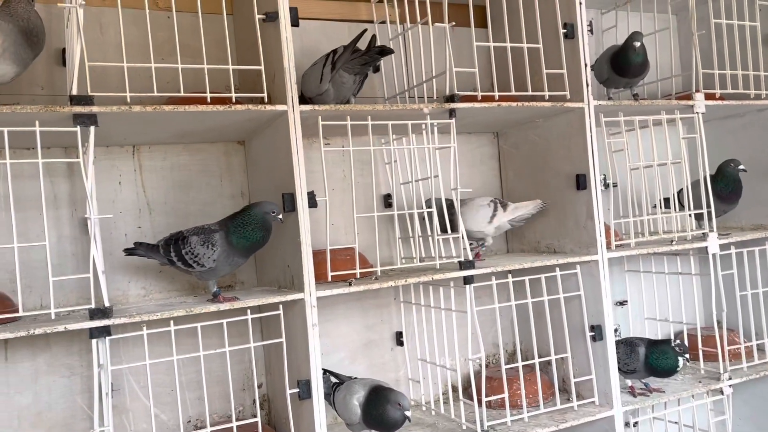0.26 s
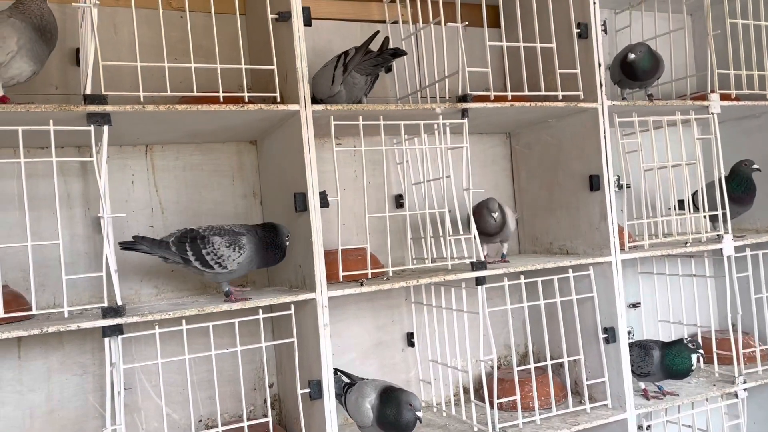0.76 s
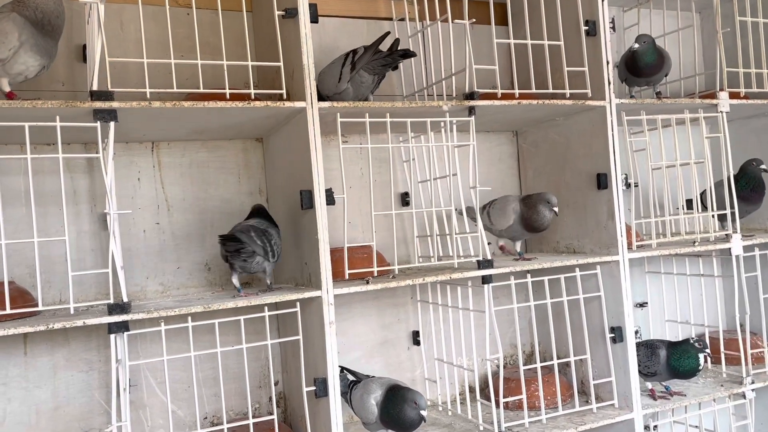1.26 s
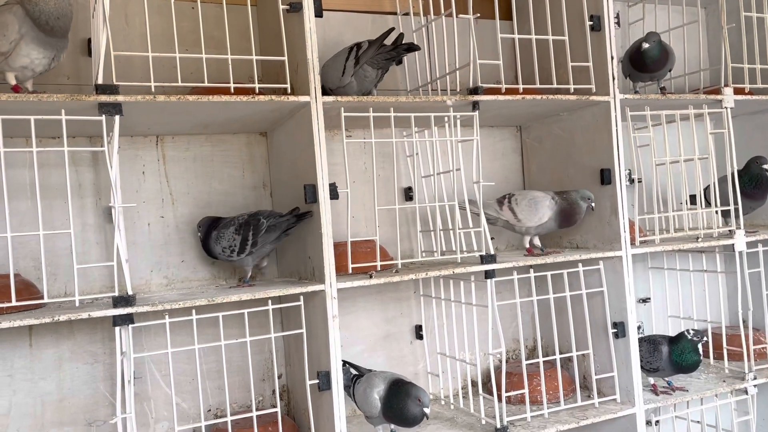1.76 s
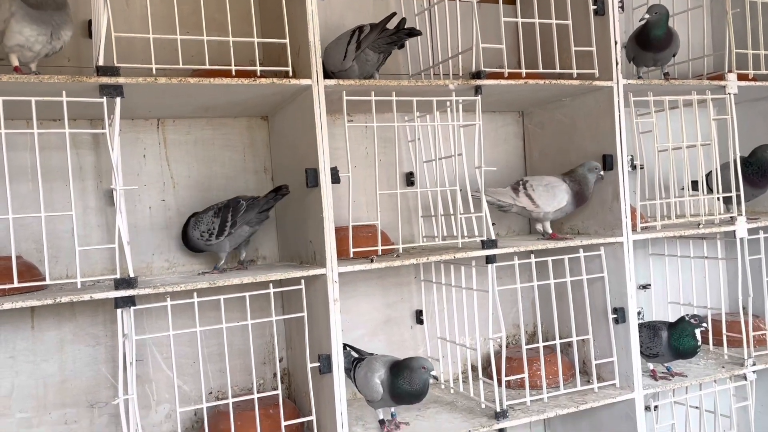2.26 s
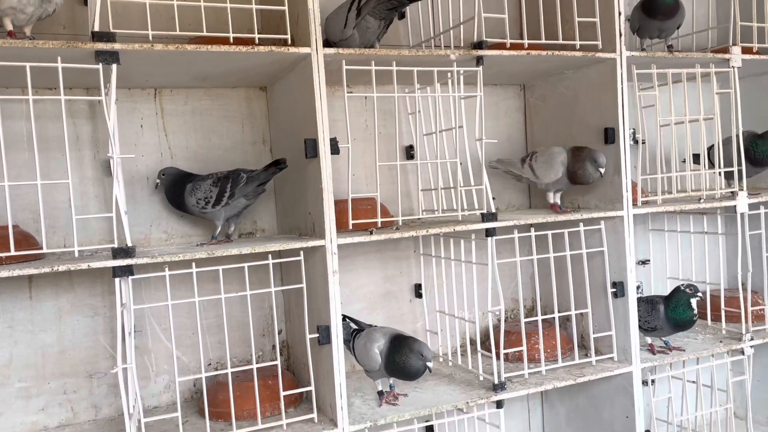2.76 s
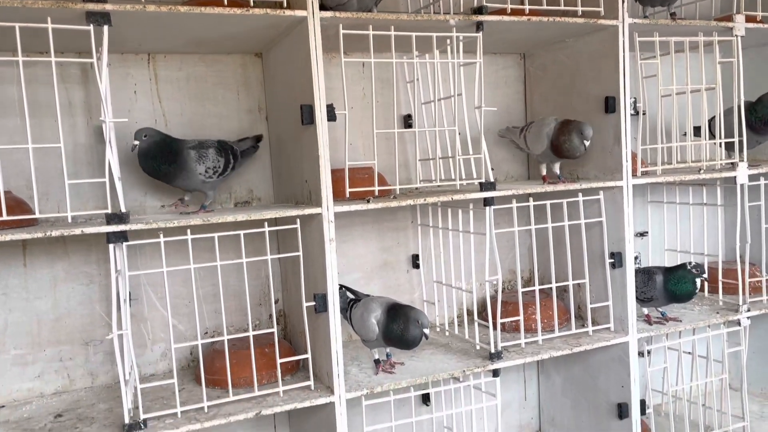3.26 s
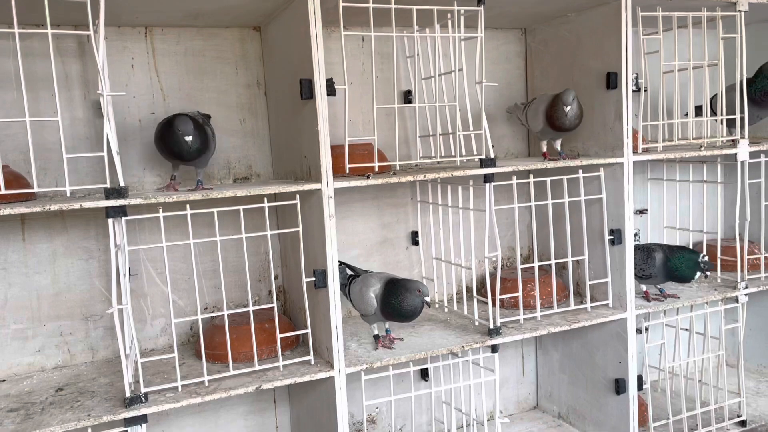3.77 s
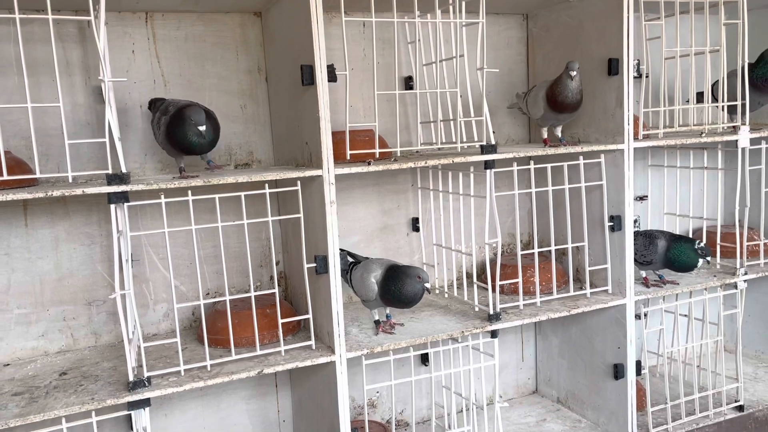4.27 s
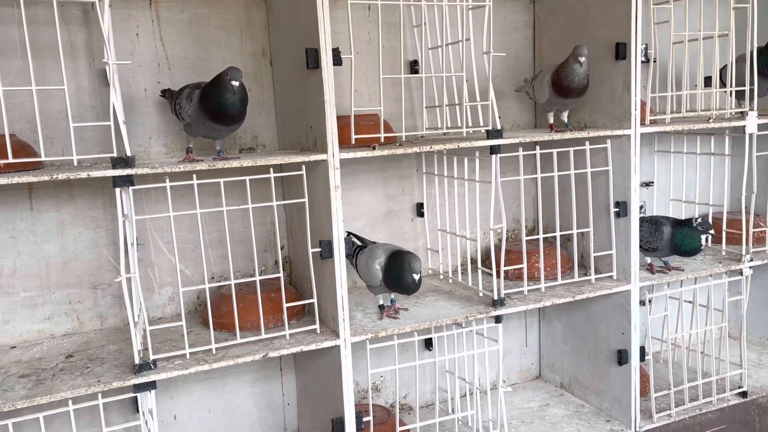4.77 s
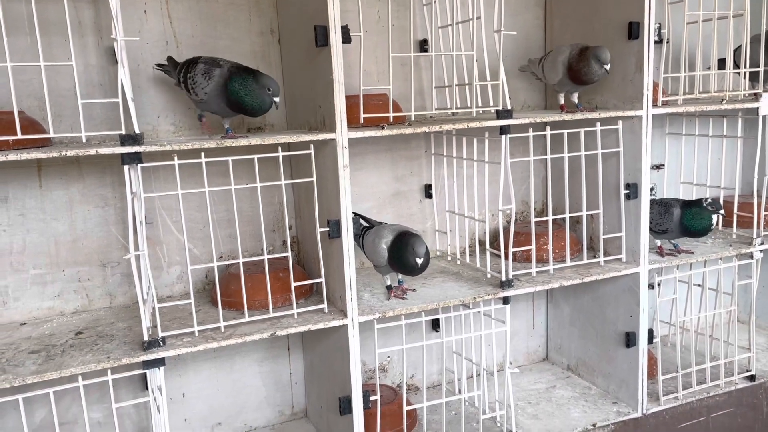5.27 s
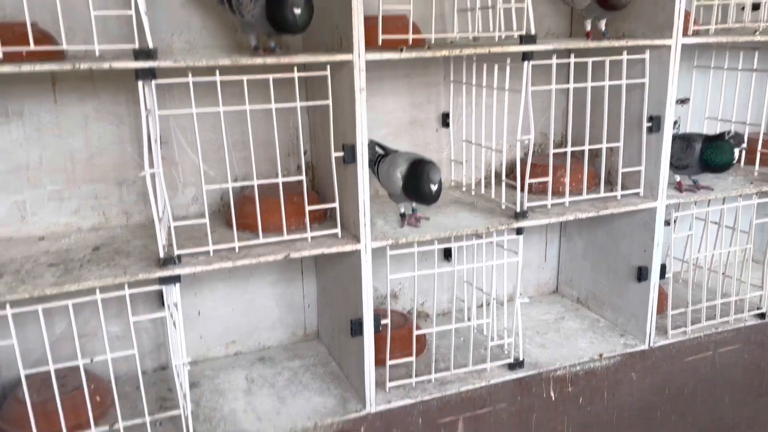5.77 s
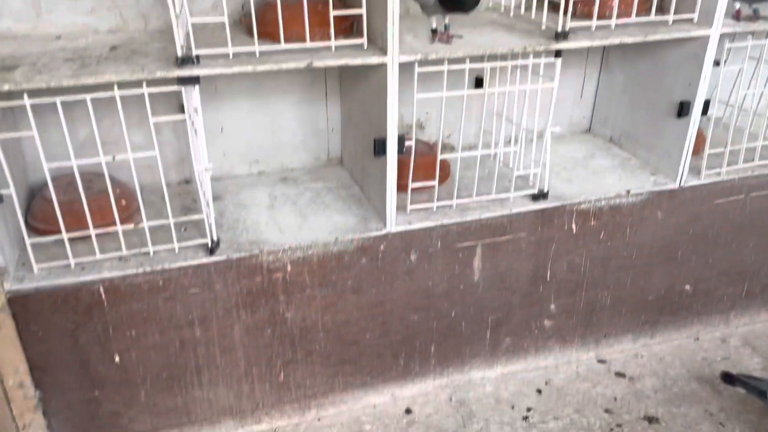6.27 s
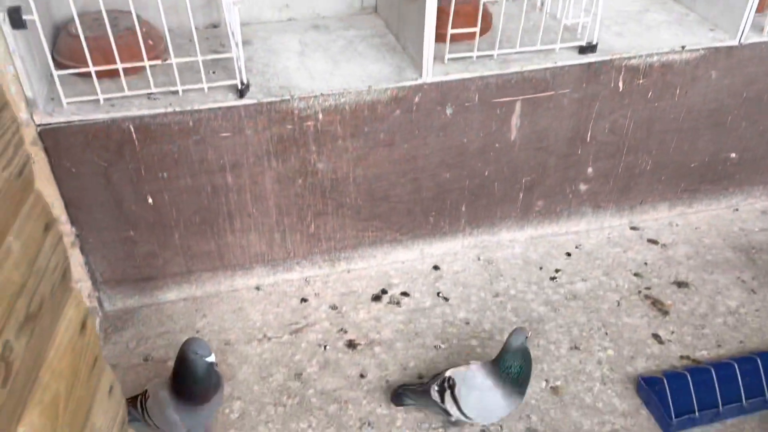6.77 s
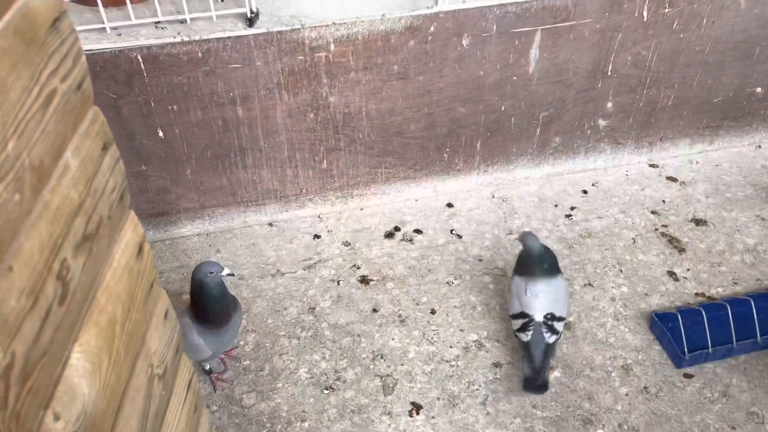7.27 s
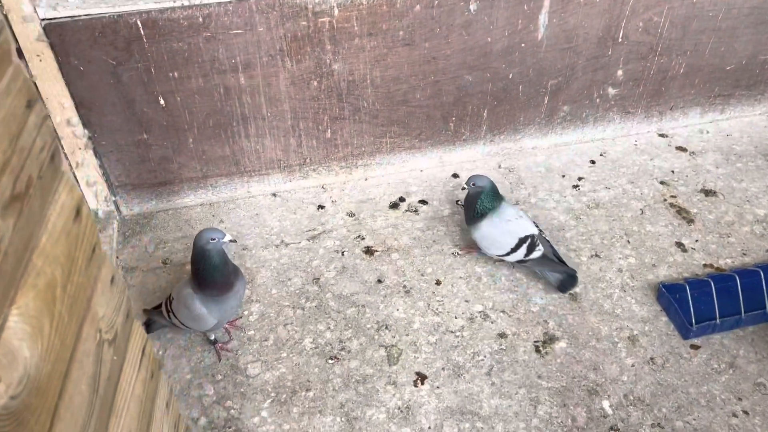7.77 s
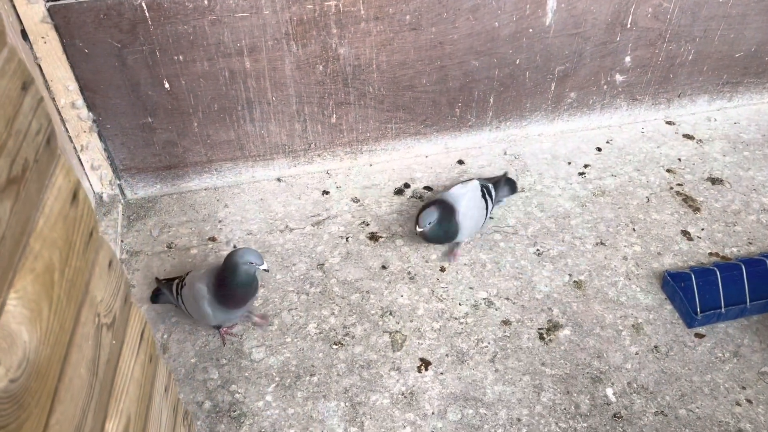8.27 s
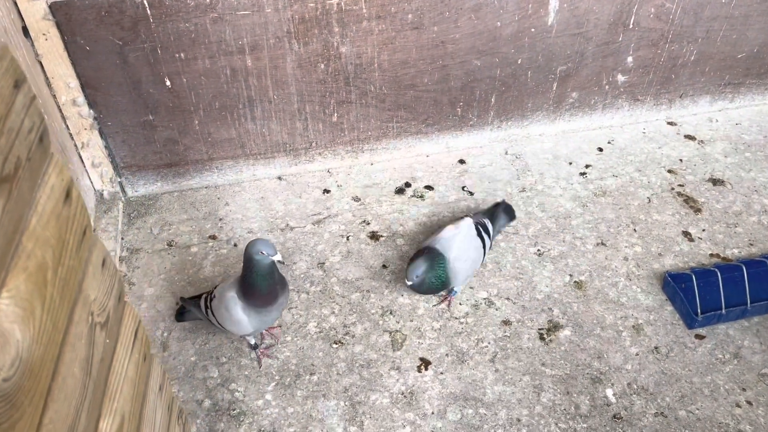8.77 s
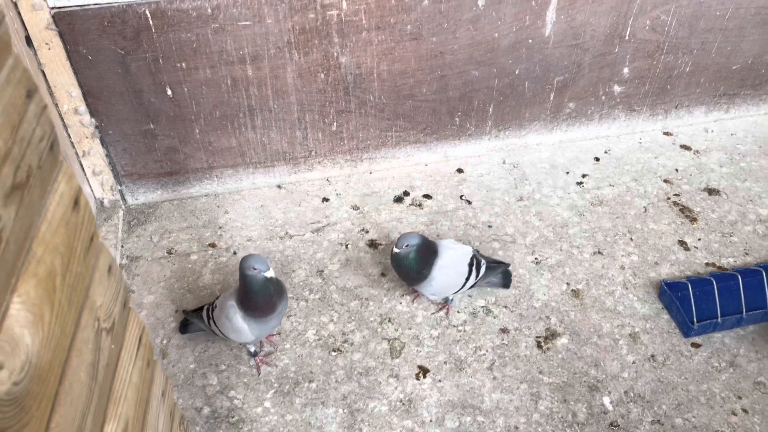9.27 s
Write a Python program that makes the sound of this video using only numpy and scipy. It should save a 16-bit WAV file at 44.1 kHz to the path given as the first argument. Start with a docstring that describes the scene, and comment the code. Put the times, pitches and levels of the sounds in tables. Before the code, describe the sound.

From the start, many pigeons coo together in a wooden loft: low, smooth, gliding notes overlap with rapid throaty rolls, strongest around 0.7-1.2 and 2.0-2.3 seconds. Farther birds blend into a soft murmur, with a short room echo, a low rumble and a steady faint hum beneath. Claws tick, shuffle and scrape irregularly on boards and wire. A soft low thump lands at about 1.3 seconds, a much fainter one near 2.4, and brief rasps appear here and there. Rolling coos gather again from 5.3. At about 5.9-6.1 a wing beats quickly, with papery slaps, feather rustle, a slight whistle and a low puff of air. Cooing continues, then thins from 7.1 to 7.6, leaving sparse claw clicks. It builds again after 8, with busy throbbing near 9 and continuing to the end at about 9.5. Close, wide stereo perspective, nearer coos slightly left.

```python
"""Pigeons coo in a wooden loft: gliding, almost pure sines, rolled into throbs; the room echoes them.
Many short farther notes murmur over a low rumble and a steady hum, both of coloured noise.
Claws tick and scrape in noise bursts and rough rings; brief rasps and two sagging thumps join in.
Just before 6 s a wing beats: slaps and rustle of filtered noise, a whistle and a low push of air.
Two close microphone ports hear it all, out of step in the treble."""
import sys
import numpy as np
from scipy import signal
from scipy.fft import rfft, irfft, next_fast_len
from scipy.io import wavfile
from scipy.ndimage import uniform_filter1d, map_coordinates

SR = 44100
rng = np.random.default_rng(int(sys.argv[2]) if len(sys.argv) > 2 else 0)


def convert_level_to_amplitude(level_db):
    """Map a level in decibels to its linear amplitude factor."""
    exponent = np.asarray(level_db, float) / 20
    return 10 ** exponent


def pcm_store(signal):
    """Save signal as 16-bit PCM."""
    levels = np.round(np.clip(np.atleast_2d(signal), -1, 1) * 32767)
    wavfile.write(sys.argv[1], SR, levels.astype(np.int16).T)


N = 419832


def unit(x):
    """Scales to rms 1."""
    return x / np.sqrt(np.mean(x ** 2) + 1e-20)


def along(points, hz):
    """Interpolates (f/Hz, value) points on a log frequency axis."""
    f, v = np.transpose(points)
    return np.interp(np.log(hz + 1), np.log(f + 1), v)


def curves(rows):
    """One value per sample for each column after the time."""
    s, *cols = np.transpose(rows)
    return [np.interp(np.arange(N) / SR, s, c) for c in cols]


def wobble(n, knots_per_s):
    """A smooth random curve of n samples."""
    knots = rng.standard_normal(int(n * knots_per_s / SR) + 4)
    return map_coordinates(knots, [np.arange(n) * knots_per_s / SR])


def filtered(x, response):
    """Applies a complex response of frequency."""
    m = next_fast_len(N + 8192)
    spectrum = rfft(x, m) * response(np.fft.rfftfreq(m, 1 / SR))
    return irfft(spectrum, m)[..., :N]


# Left-right likeness of scattered sound: f/Hz, correlation before the lean
LIKENESS = [(30, 0.77), (60, 1), (160, 0.94), (300, 0.95), (500, 0.17), (1000, 0.62), (3000, 0.36),
            (6000, 0.16), (7600, 0.98), (9400, 0.96), (11500, 0.75), (14000, 1)]
# Left-right lean of scattered sound: f/Hz, level/dB
LEAN_DB = [(60, 0.2), (300, 3.5), (1000, 1), (5500, 4), (7600, 0)]


def spread(pair, gain):
    """Mixes two unrelated sounds into coloured left and right of set likeness, rms 1."""
    def split(hz):
        turn_rad = np.arccos(np.clip(along(LIKENESS, hz), -1, 1)) / 2
        return gain(hz) * [np.cos(turn_rad), np.sin(turn_rad)]

    mid, side = filtered(pair, split)
    left_right = np.array([mid + side, mid - side])
    return unit(filtered(left_right, lambda hz: convert_level_to_amplitude(along(LEAN_DB, hz) / [[2], [-2]])))


def rush(colour, patchy_db=0):
    """Stereo noise of one colour, with time-frequency patches of random gain."""
    z = signal.stft(rng.standard_normal((2, N)), nperseg=512)[2]
    field = uniform_filter1d(rng.standard_normal(z.shape[1:]), size=5, axis=0)
    field = uniform_filter1d(field, size=8, axis=1)
    pair = signal.istft(z * convert_level_to_amplitude(patchy_db * unit(field)), nperseg=512)[1][:, :N]
    return spread(pair, lambda hz: convert_level_to_amplitude(along(colour, hz)))


def swell(t, s, ms):
    """A smooth bump centred on s; ms is its width at half height."""
    return np.cos(np.clip((t - s) / (ms / 1000), -1, 1) * np.pi / 2) ** 2


def dying(at, db, t60_s, rise_s):
    """Envelope of noise bursts that rise fast and die away, their energies summed."""
    t = np.arange(SR // 2) / SR
    kicks = np.bincount(at, convert_level_to_amplitude(2 * db), N)
    energy_decay = convert_level_to_amplitude(-120 * t / t60_s) * (1 - np.exp(-t / rise_s))
    return np.sqrt(np.abs(signal.fftconvolve(kicks, energy_decay)[:N]))


def voice(hz, pan_db, overtone_db=-40):
    """The closed-beak coo: a sine with a faint octave, slightly out of step at the two ports."""
    port_rad = 0.21 * rng.standard_normal() * np.array([[1], [-1]])
    phase = 2 * np.pi * (np.cumsum(hz) / SR + rng.random()) + port_rad
    tone = np.sin(phase) + convert_level_to_amplitude(overtone_db) * np.sin(2 * phase)
    return tone * convert_level_to_amplitude([[pan_db / 2], [-pan_db / 2]])


NEAR_PAN_DB, PAN_SCATTER_DB = 5, 2.5
# Held notes, one list of points each: t/s, f/Hz, level/dB
HELD_NOTES = [
    [(0.0, 132.5, -44), (0.2, 140.0, -49)],
    [(0, 261.3, -35), (0.14, 259.7, -33), (0.27, 254, -41)],
    [(0.0, 406.7, -34), (0.122, 362.8, -43.5), (0.13, 364.1, -60)],
    [(0.02, 521.0, -47), (0.22, 526, -57)],
    [(0.29, 300, -47), (0.39, 317, -46)],
    [(0.33, 168, -55), (0.46, 203, -43)],
    [(0.31, 420, -35), (0.36, 365, -34), (0.45, 325, -29)],
    [(0.42, 282.7, -37.5), (0.55, 301, -36.5), (0.67, 275, -29)],
    [(0.42, 525, -54), (0.59, 511, -48)],
    [(0.55, 270.3, -39), (0.7, 257.5, -34)],
    [(0.66, 257.3, -36), (0.78, 278, -31), (1.0, 279.1, -31.5), (1.16, 276.3, -25)],
    [(0.68, 456, -38), (0.85, 465, -47)],
    [(0.7, 212.5, -37), (0.78, 203.0, -35.5), (0.888, 203.0, -39), (0.954, 212.0, -38), (1.06, 206.9, -41),
     (1.1, 214.3, -35)],
    [(0.71, 376.3, -29), (0.83, 365.4, -33.5), (0.98, 356, -25.5), (1.2, 365, -34.5)],
    [(0.84, 157.4, -52), (0.99, 171, -46)],
    [(0.92, 415, -38), (1.09, 426, -42)],
    [(1.13, 168.0, -40.5), (1.37, 154.4, -48)],
    [(1.2, 262, -38), (1.29, 251, -37)],
    [(1.3, 269, -36), (1.46, 241.3, -37)],
    [(1.4, 323, -56), (1.52, 318, -35)],
    [(1.53, 494.0, -45), (1.76, 475, -60)],
    [(1.57, 328, -57), (1.7, 318, -38)],
    [(1.79, 205.2, -46), (1.87, 200.5, -34), (1.876, 200.5, -49), (1.964, 208.8, -37), (2.1, 206.1, -49)],
    [(2.97, 206.0, -39.5), (3.068, 213.3, -37), (3.102, 201.0, -43), (3.172, 200.6, -37),
     (3.22, 224.5, -42)],
    [(2.93, 300, -37), (3.05, 310, -39)],
    [(1.8, 588, -54.5), (1.96, 608, -50)],
    [(1.81, 283.3, -35), (1.94, 272, -39)],
    [(1.87, 516.0, -48), (1.99, 499, -64)],
    [(1.92, 416, -38), (1.994, 421.2, -25.5), (2.042, 410, -36.5), (2.1, 413, -35)],
    [(1.97, 351.0, -37), (2.3, 346, -37)],
    [(2.1, 300.1, -33), (2.2, 273.3, -28), (2.33, 269.1, -30.5), (2.45, 253.4, -31.5), (2.58, 261.3, -38),
     (2.68, 238.8, -33.5), (2.79, 181.4, -34), (2.9, 190, -52)],
    [(2.27, 290.7, -30), (2.48, 281, -36.5)],
    [(2.3, 381.3, -38), (2.43, 373, -39)],
    [(2.32, 125.7, -56), (2.44, 140, -45), (2.61, 111.0, -57)],
    [(2.43, 511, -44), (2.55, 520.0, -48)],
    [(2.58, 474, -51), (2.7, 481, -46)],
    [(2.84, 506, -57), (2.98, 505, -49)],
    [(2.96, 422.9, -49), (2.974, 422.9, -29.5), (3.084, 421.6, -31.5), (3.124, 385.3, -33),
     (3.174, 410.9, -37), (3.282, 404.4, -40), (3.3, 387.0, -37)],
    [(3.25, 284, -36), (3.38, 295, -26.5)],
    [(3.27, 246, -27.5), (3.42, 271, -30)],
    [(3.4, 513, -43), (3.58, 534, -64)],
    [(3.43, 341.7, -34), (3.61, 349, -46)],
    [(3.6, 228.7, -43), (3.72, 223, -38)],
    [(3.63, 257.3, -36.5), (3.74, 251.2, -36.5), (3.82, 270.2, -34), (4.0, 247, -38)],
    [(3.66, 438.0, -57), (3.79, 427.0, -51)],
    [(3.66, 501.0, -57), (3.84, 543, -45)],
    [(3.72, 127.6, -48.5), (3.97, 152.6, -46.5)],
    [(3.89, 338, -31.5), (4.15, 346.5, -28.5)],
    [(4.1, 521, -45.5), (4.2, 494, -42.5)],
    [(4.11, 250.5, -32), (4.28, 288.7, -32.5)],
    [(4.25, 425.4, -35.5), (4.45, 393.3, -46)],
    [(4.29, 203.7, -35.5), (4.43, 187, -37)],
    [(4.36, 366, -39), (4.51, 414, -33.5)],
    [(4.41, 286.3, -53), (4.424, 285.7, -29.5), (4.594, 282.7, -32), (4.714, 265.4, -31),
     (4.826, 273, -30.5), (4.874, 275, -56), (4.88, 281.8, -40)],
    [(4.52, 310, -27), (4.65, 301, -34)],
    [(4.57, 130, -49), (4.71, 130.0, -46)],
    [(4.61, 207.3, -50), (4.88, 211.7, -41.5), (5.04, 244.4, -40)],
    [(4.86, 143.7, -44), (4.98, 140, -48)],
    [(4.93, 333.2, -47), (5.03, 345.2, -37), (5.18, 354, -37)],
    [(4.97, 265.7, -47), (5.12, 264, -43)],
    [(4.98, 159.4, -50), (5.15, 184.5, -39)],
    [(5.25, 473, -52), (5.37, 443, -41)],
    [(5.26, 237.3, -30), (5.39, 223, -36)],
    [(5.28, 358, -33), (5.45, 342, -37)],
    [(5.3, 389.7, -33), (5.6, 388.8, -32.5)],
    [(5.34, 270.4, -50), (5.54, 270, -34)],
    [(5.4, 198, -37), (5.56, 197, -40)],
    [(5.6, 274, -42), (5.93, 232, -34.5)],
    [(5.62, 367.4, -40), (5.74, 393, -33.5)],
    [(5.89, 375, -34), (6.02, 403, -42)],
    [(5.93, 158.6, -45), (6.07, 151, -43.5), (6.31, 160.5, -39), (6.42, 134, -48.5)],
    [(6.07, 292.3, -50), (6.17, 279.2, -23), (6.31, 290.4, -32.5), (6.38, 272, -34), (6.46, 265, -27.5)],
    [(6.07, 324, -54), (6.19, 322, -36)],
    [(6.12, 407.5, -35), (6.24, 404.5, -35)],
    [(6.21, 544, -43.5), (6.31, 555, -55.5), (6.48, 532, -47)],
    [(6.24, 374, -33), (6.39, 397.4, -36)],
    [(6.56, 216.3, -42), (6.58, 220.9, -40), (6.714, 227.9, -32), (6.768, 255.2, -34.5),
     (6.856, 234.5, -34), (6.9, 246, -37)],
    [(6.58, 438, -44.5), (6.75, 447, -44)],
    [(6.8, 258.9, -35), (6.842, 287, -29), (6.894, 286, -39), (7.004, 282.6, -34), (7.08, 281, -45)],
    [(6.98, 420, -39), (7.06, 346, -40), (7.18, 359, -49)],
    [(7, 274.5, -29), (7.06, 194, -40)],
    [(7.15, 442, -50), (7.32, 438, -57.5), (7.43, 422, -56)],
    [(7.55, 118.5, -58), (7.63, 151, -40.5)],
    [(7.65, 174.6, -41), (7.718, 189.5, -45.5), (7.828, 204, -39.5), (7.94, 201, -44), (7.97, 221, -36)],
    [(8.0, 220, -39), (8.066, 221, -41), (8.104, 200, -41.5), (8.146, 194.5, -35), (8.26, 193.7, -38)],
    [(7.62, 388, -50.5), (7.79, 385, -52), (7.86, 430, -43)],
    [(7.92, 393, -39), (7.974, 422.1, -38.5), (8.04, 438.7, -38.5), (8.082, 423, -33), (8.116, 393, -44),
     (8.288, 370.5, -35), (8.33, 398.7, -41)],
    [(7.67, 290, -53), (7.82, 342, -60), (7.92, 333, -45)],
    [(8.0, 291.6, -43), (8.2, 277, -49)],
    [(8.35, 314.4, -42), (8.57, 319, -33)],
    [(8.4, 282.8, -36), (8.53, 279.3, -26), (8.62, 285, -29), (8.72, 298, -32.5)],
    [(8.43, 141, -45), (8.47, 141, -38.5), (8.6, 141, -46.5)],
    [(8.62, 173.8, -43), (8.63, 173.5, -36.5), (8.88, 176.6, -46), (8.9, 175.9, -53)],
    [(8.95, 189.3, -41), (9.066, 191.3, -41), (9.13, 198.0, -36.5), (9.304, 197.8, -39),
     (9.322, 192.6, -43), (9.336, 190.4, -31.5), (9.42, 181.6, -55)],
    [(9.45, 160, -41), (9.52, 160, -33)],
    [(8.2, 215, -35), (8.27, 200, -42)],
    [(9.28, 740, -58), (9.38, 735, -56)],
    [(8.45, 398.5, -42), (8.458, 402.8, -36.5), (8.64, 398.8, -40), (8.704, 418.5, -41), (8.75, 391.9, -47)],
    [(8.85, 403.7, -34), (9.012, 397.3, -40), (9.046, 405.8, -36), (9.138, 396.3, -30),
     (9.22, 397.4, -41.5)],
    [(8.68, 358.5, -30), (8.722, 353.6, -34), (8.86, 359.7, -32.5), (9.002, 343.4, -31.5),
     (9.048, 351.2, -29), (9.128, 354.0, -31), (9.13, 354.1, -35)],
    [(8.88, 303.8, -31), (9.0, 315.4, -31)],
    [(8.98, 285, -27), (9.19, 304, -38)],
    [(9.05, 122.4, -55), (9.27, 131.0, -53)],
    [(9.1, 278.5, -37), (9.32, 270, -35)],
    [(9.24, 400.3, -31), (9.248, 401.1, -37), (9.3, 382.9, -35.5), (9.468, 357.6, -41), (9.51, 358.0, -34)],
]


def coos(murmur_db):
    """Held notes glide, waver, flutter and give way while the same throat throbs."""
    lead_s, attack_s, release_s = .025, .035, .07
    waver_db, flutter_depth, flutter_hz = 1.8, .1, 36
    out = throbs(murmur_db)
    for note, side in zip(HELD_NOTES, rng.standard_normal(len(HELD_NOTES))):
        s, pitch_hz, db = np.transpose(note)
        first = max(round((s[0] - lead_s) * SR), 0)
        n = np.arange(first, min(round((s[-1] + release_s / 2) * SR), N))
        hz = uniform_filter1d(np.interp(n / SR, s, pitch_hz), size=1500, mode="nearest")
        fade = np.clip(np.minimum((n - n[0]) / attack_s, (n[-1] - n) / release_s) / SR, 0, 1)
        level = np.sqrt(2) * convert_level_to_amplitude(np.interp(n / SR, s, db) + waver_db * wobble(len(n), 14.85))
        flutter_rate = flutter_hz * (1 + 0.24 * wobble(len(n), 6.48))
        flutter = np.sin(2 * np.pi * (np.cumsum(flutter_rate) / SR + rng.random()))
        level *= 1 + flutter_depth * flutter
        for at, _, throb_hz, ms in THROAT_PULSES:
            if s[0] < at < s[-1]:
                nearness = np.exp(-((hz - throb_hz) / 45) ** 2)
                level *= 1 - 0.95 * swell(n / SR, at, ms) * nearness
        wavering_hz = hz * (1 + 0.0061 * wobble(len(n), 12.43))
        out[:, n] += fade * level * voice(wavering_hz, NEAR_PAN_DB + PAN_SCATTER_DB * side)
    return out


# Loud pulses of rolled coos: t/s, level/dB, f/Hz, longest half-height width/ms
THROAT_PULSES = [(0.116, -23, 309, 12.1), (0.143, -25, 280.5, 44), (0.314, -22, 299, 20),
                 (0.406, -17, 338, 29.6), (0.498, -21, 286, 17.5), (0.706, -19, 284, 11.6),
                 (0.765, -13, 358.6, 28), (0.837, -21.5, 282, 21.5), (0.843, -16, 377, 14.4),
                 (0.907, -13, 319, 7.3), (0.94, -17, 360, 8.3), (0.953, -14.5, 373, 20),
                 (0.992, -19, 340, 29), (1.02, -18.5, 341, 14), (1.046, -19, 327, 5.9),
                 (1.061, -18.5, 301, 16), (1.077, -20, 276, 11.8), (1.112, -16, 284.7, 25),
                 (1.152, -13, 304, 6), (1.848, -24, 290, 13.2), (1.918, -21, 269, 19),
                 (1.989, -18.5, 269.4, 25.3), (1.993, -22, 394, 10.9), (2.007, -14.5, 358, 6.9),
                 (2.071, -14, 318, 10.7), (2.095, -15.5, 323, 14.4), (2.142, -16.5, 329, 15.5),
                 (2.162, -16, 306, 8.9), (2.176, -12.5, 315, 9.4), (2.205, -19, 316, 12),
                 (2.22, -21.5, 281, 11), (2.267, -22, 269, 23), (2.296, -22.5, 282.6, 26),
                 (2.397, -24.5, 289, 45), (2.564, -18, 264.3, 45), (2.978, -23.5, 418.5, 23),
                 (3.006, -21.5, 302, 15.44), (3.074, -23.5, 416.3, 31.4), (3.076, -20, 278, 16),
                 (3.219, -23, 262, 16), (3.273, -20.5, 270, 14), (3.349, -21.5, 277, 16.9),
                 (3.386, -29.5, 260.6, 32), (3.509, -24.5, 340, 25.5), (3.792, -23.5, 324, 9.9),
                 (3.901, -19.5, 350.7, 16), (3.945, -18, 327, 14.6), (3.971, -18.5, 333, 23),
                 (4.057, -19.5, 368, 16.2), (4.093, -15.5, 329, 11), (4.119, -25, 343, 21.5),
                 (4.146, -25, 273.5, 27), (4.167, -22, 237.2, 13), (4.244, -20, 318, 15),
                 (4.345, -21.5, 263, 17.4), (4.542, -20.5, 301, 9.8), (4.566, -20.5, 289, 23),
                 (4.603, -22.5, 303.6, 37), (5.139, -22.5, 341, 16.2), (5.306, -18, 252.5, 11.2),
                 (5.323, -20.5, 382, 11.3), (5.367, -15, 331, 11.7), (5.371, -21.5, 254, 10.3),
                 (5.436, -13.5, 294, 15), (5.475, -20, 375, 16), (5.521, -20, 370, 12.6),
                 (5.52, -20, 243, 8.3), (5.636, -15, 280, 17.1), (5.647, -18.5, 307, 8.1),
                 (5.668, -21, 353, 9.3), (5.689, -18, 350, 6.6), (5.707, -20, 266, 16),
                 (5.754, -18.5, 254, 11), (5.776, -21.5, 245, 18), (5.794, -26, 281, 22),
                 (5.815, -22, 268, 15), (5.828, -17, 342, 10), (5.855, -19, 248, 7.3),
                 (5.92, -13.5, 325, 8.9), (6.092, -21, 371, 17.5), (6.109, -15, 312, 16.3),
                 (6.135, -20, 284, 16.4), (6.164, -18.5, 277, 16), (6.199, -20, 274, 18),
                 (6.229, -18, 310, 9.4), (6.248, -19.5, 276, 28), (6.289, -20, 275, 14),
                 (6.31, -20, 298, 10), (6.393, -20.5, 262, 41), (6.458, -19.5, 325, 15.1),
                 (6.723, -15.5, 348, 11.6), (6.755, -22, 312, 11), (6.786, -25.5, 292, 22.7),
                 (6.837, -22.5, 289, 15), (6.86, -20.5, 276, 7.8), (6.877, -26, 240, 12.6),
                 (7.012, -24, 251, 14.7), (7.05, -22.5, 340, 5.9), (7.883, -27, 348, 12),
                 (8.092, -27, 411, 21), (8.286, -22, 273, 10.9), (8.36, -19, 266, 8.6),
                 (8.42, -20.5, 283, 16.7), (8.467, -17, 325.5, 23), (8.494, -17.5, 302, 16.4),
                 (8.519, -19, 302, 17.5), (8.564, -16.5, 314.4, 28), (8.612, -17, 310, 11),
                 (8.704, -23.5, 283, 20.4), (8.787, -20.5, 300, 10.2), (8.84, -22, 332, 12),
                 (8.853, -22, 330, 7.8), (8.864, -16.5, 325, 7.6), (8.887, -17.5, 335, 7.6),
                 (8.926, -19.5, 320, 15), (8.972, -17, 306.3, 22.3), (9.008, -15, 321, 11),
                 (9.025, -27, 354, 8), (9.042, -16, 338, 9.4), (9.057, -19.5, 348, 9.9),
                 (9.076, -14, 340, 11), (9.112, -22, 305, 15), (9.146, -20, 320, 8.2),
                 (9.226, -24.5, 314, 39), (9.274, -25.5, 277, 20.4), (9.297, -21.5, 253, 6.9),
                 (9.363, -26, 368, 14.6)]


def throbs(murmur_db, count=60):
    """Short swells, each on one pitch; in a roll a swell is over before the next one peaks."""
    roll_share, same_throat_hz = 0.85, 35  # share of the time to the nearest pulse; pitch range
    faint_ms, faint_scatter_db = 16, 4
    tilt_db_per_octave, throat_hz = -12, 356
    out = np.zeros((2, N))
    times, pitches = np.transpose(THROAT_PULSES)[[0, 2]]
    rows = []
    for s, db, hz, ms in THROAT_PULSES:
        same_throat = (np.abs(pitches - hz) < same_throat_hz) & (times != s)
        gap_ms = 1000 * np.abs(times - s)[same_throat].min()
        rows.append((s, db, hz, min(ms, roll_share * gap_ms)))
    # small throbs at random, around the level of the murmur
    for when, high, loud, long in rng.random((count, 4)):
        s = .1 + when * (N / SR - .2)
        hz = 140 * 4 ** high
        db = murmur_db[round(s * SR)] + faint_scatter_db * (2 * loud - 1)
        db += tilt_db_per_octave * abs(np.log2(hz / throat_hz))
        rows.append((s, db, hz, faint_ms * (.5 + long)))
    for s, db, hz, ms in rows:
        n = np.arange(round((s - ms / 1000) * SR), round((s + ms / 1000) * SR))
        out[:, n] += convert_level_to_amplitude(db) * swell(n / SR, s, ms) * voice(np.full(len(n), hz), NEAR_PAN_DB)
    return out


# Decay of the room's answer: f/Hz, t60/s
LOFT_T60_S = [(200, 0.48), (1000, 0.72)]


def loft(x):
    """Room echo: a noise tail in which each frequency dies at its own speed."""
    hz, t, z = signal.stft(rng.standard_normal((2, SR // 2)), SR, nperseg=256)
    decay = convert_level_to_amplitude(-60 * t / along(LOFT_T60_S, hz)[:, None])
    tail = signal.istft(z * decay, SR, nperseg=256)[1]
    late = np.pad(x, (400, 0))[None]  # 9 ms
    return signal.fftconvolve(late, tail / np.linalg.norm(tail[0]), axes=1)[:, :N]


# Colour of the far birds: f/Hz, relative level/dB per Hz
MURMUR_COLOUR = [(53, -31.5), (90, -24), (178, -6), (279, -5), (394, -1.5), (540, -12), (660, -20.5),
                 (865, -30), (1100, -35), (1430, -45), (2420, -120)]


def far_birds(level_db, count=850):
    """Many overlapping, slightly gliding notes of farther birds over their blurred echo."""
    start, long, high, loud, side, glide = rng.random((count, 6)).T[..., None]
    t = np.arange(SR // 3) / SR
    life_s = .05 + .16 * long ** 2
    hz = 115 * 5 ** high
    envelope = np.sin(np.pi * np.clip(t / life_s, 0, 1)) ** 2
    notes = envelope * np.sin(2 * np.pi * hz * t * (1 + 0.33 * (glide - .5) * t))
    notes *= convert_level_to_amplitude(3 * loud) / np.sqrt(life_s)
    # sum the notes into two channels laid end to end
    room = N + len(t)
    at = (start * N).astype(int) + np.arange(len(t)) + (side > .5) * room
    pair = np.bincount(at.ravel(), notes.ravel(), 2 * room).reshape(2, -1)[:, :N]
    notes = spread(pair, lambda f: convert_level_to_amplitude(along(MURMUR_COLOUR, f)) * np.sqrt(f))
    return convert_level_to_amplitude(level_db - 4) * (0.7 * notes + 0.65 * rush(MURMUR_COLOUR))


# Colour of the building's rumble: f/Hz, relative level/dB per Hz
RUMBLE_COLOUR = [(12, -61), (20, -30), (30, -47.5), (51, 7.5), (97, 1.5), (130, 1.5), (170, -23),
                 (290, -120)]
# Colour of the loft's steady hum: f/Hz, relative level/dB per Hz
HUM_COLOUR = [(90, -37), (130, 8.5), (350, -21.5), (600, -5.5), (830, -6), (1150, -17), (1800, -14),
              (2600, -30), (6500, -39.5), (7600, -120)]


def rumble_and_hum(rumble_db):
    """Low noise of varying level over patchy noise of steady level."""
    return convert_level_to_amplitude(rumble_db) * rush(RUMBLE_COLOUR) + convert_level_to_amplitude(-54.5) * rush(HUM_COLOUR, patchy_db=3.5)


def scrapes(at, db, hz):
    """Rough, narrow rings: each a sine times fast random curves, dying away."""
    out, t = np.zeros((2, N + SR)), np.arange(SR // 8) / SR
    for n, level_db, f in zip(at, db, hz):
        rough = np.array([wobble(len(t), 260), wobble(len(t), 260)])
        envelope = convert_level_to_amplitude(level_db - 60 * t / 0.29) * (1 - np.exp(-t / 0.0024))
        out[:, n:n + len(t)] += envelope * rough * np.sin(2 * np.pi * f * t)
    return out[:, :N]


# Claw steps: t/s, level/dB, then relative board/dB, grit/dB, room/dB
CLAW_STEPS = [(0.103, -39, -6, -18, -1), (0.288, -34.5, -9, -13, -19), (0.347, -29, -9, -18, -1),
              (0.392, -39.5, -4, -15, 6), (0.4796, -35, -4.5, -18, 0.5), (0.715, -46, -9, -13.5, 13.5),
              (0.833, -31, -4, -18, -0.5), (0.944, -27.5, -14, -18, 2.5), (1.158, -36.5, -8, -21, 8.5),
              (1.304, -26.5, -6.5, -19, -2), (1.403, -38, -9, -13, 7), (1.522, -35.5, 0.5, -19, -1.5),
              (1.6074, -33.5, -3, -17, -6), (1.67, -35.5, -14, -13, 5), (1.719, -29.5, -7.5, -16, -3),
              (1.844, -34, -11, -17, 1.5), (2.0244, -35.5, 1, -27, -5), (2.0975, -31, -2, -17, -5),
              (2.154, -43, -18, -10, -1), (2.182, -32.5, -11, -12, -1.5), (2.559, -35, -22, -19, -14),
              (2.68, -40.5, -7, -10.5, 3), (2.7055, -32, -5, -9.5, -5), (2.8443, -37.5, -13, -16, 4),
              (2.863, -43, 2, -23, 7.5), (2.979, -39.5, -3, -19, 2.5), (3.102, -34, -9, -17, 2.5),
              (3.258, -42, -4, -15, 3), (3.31, -34.5, -4.5, -22, 1.5), (3.4082, -35.5, -1, -17, -4),
              (3.4943, -39, -9, -18, 3), (3.563, -33, -1, -18, -1), (3.6747, -45, -1, -14, 3.5),
              (3.727, -36, -1.5, -19, 4.5), (3.8, -42, 4, -18, -5), (3.9443, -45, 4, -20, 3),
              (4.0684, -33.5, -5, -16, -1), (4.116, -36.5, -14, -15, -1), (4.137, -40.5, -1.5, -9.5, 6.5),
              (4.364, -41, -5.5, -18, 8.5), (4.563, -40, -2, -16, 2), (4.604, -36.5, -3.5, -9, 1),
              (4.8467, -41.5, -3.5, -10, 1), (4.9366, -34.5, -6, -18.5, 2), (4.9694, -39, -19, -17, 6),
              (5.0067, -30.5, -7.5, -17, -3), (5.11, -50, -13, -2, -14), (5.215, -42, -2, -16, 6.5),
              (5.277, -40.5, -2, -9, 2), (5.361, -43, -5, -12, 7.5), (5.4326, -31.5, -6.5, -21.5, 3),
              (5.555, -22.5, 2, -23, -3), (5.6327, -37, -5, -11, 5.5), (5.726, -34.5, -1, -13, -4.5),
              (5.787, -25.5, 0, -42, -6), (5.893, -28, -15, -14, -4), (5.9444, -32.5, -10, -19, 5),
              (5.986, -28.5, 6.5, -19, -1.5), (6.0837, -30, -7, -10, -3), (6.0905, -25, 4.5, -30, -6.5),
              (6.455, -43.5, -19, -11.5, 8), (6.5228, -33.5, -2, -19, -4), (6.6407, -41.5, -13, -28, 5),
              (6.812, -39.5, -1, -28, -3), (6.8381, -28.5, -9, -15, -5.5), (6.927, -44.5, -17, -13, 13),
              (6.953, -32, -9.5, -7, 5.5), (7.1546, -41, -5, -16, -1), (7.2144, -34.5, -8.5, -19, -0.5),
              (7.3185, -39, -25, -15.5, -2.5), (7.542, -33, -10, -21, 1), (7.6226, -31, -6.5, -19, -5.5),
              (7.7774, -40, -10, -16, 3), (7.8224, -40, -1.5, -18, -1), (8.0382, -33, -30, -17.5, 0.5),
              (8.101, -39.5, -25, -20, -4), (8.2944, -44.5, -9, -11, 6), (8.336, -35.5, -11, -19, 3),
              (8.3904, -34, -6, -19, -1), (8.5284, -34, -3.5, -25, 4.5), (8.687, -32.5, 0, -11.5, -6.5),
              (8.7597, -50, -15, -4.5, 4), (8.78, -34, -11, -23, -3.5), (8.839, -28.5, -10.5, -17, -3),
              (8.919, -34, -1, -16.5, -6.5), (9.2433, -42, -6.5, -23, 10)]
# Colour of the boards: f/Hz, relative level/dB per Hz
BOARD_COLOUR = [(400, -7), (700, -4.5), (1200, -9), (2000, -14), (3000, -24.5), (5000, -53.5), (7000, -120)]
# Colour of the claws: f/Hz, relative level/dB per Hz
CLAW_COLOUR = [(1200, -16.5), (2200, 0), (3500, -1), (5500, -3.5), (7000, -8), (7600, -14), (8200, -60),
               (9000, -120)]
# Colour of the grit: f/Hz, relative level/dB per Hz
GRIT_COLOUR = [(5500, -19), (7300, -4), (9000, -0.5), (10500, 0.5), (12500, -4), (13600, -15), (14600, -46),
               (16000, -83)]


def steps(shuffle_db, count=170):
    """Claws tick and scrape, boards and walls answer; small steps farther off fill the gaps."""
    claw_db, grit_gain_db, scrape_db = -10, 9, -25
    scrape_low_hz, scrape_octaves = 1336, 1.5
    answer_s, answer_rise_s = 0.0016, 0.0062
    s, db, board_db, grit_db, room_db = np.transpose(CLAW_STEPS)
    at = np.round(s * SR).astype(int)
    when, size = rng.random((count, 2)).T
    patter = unit(dying((when * N).astype(int), 8 * size, .3, .003) + 1)
    scrape_hz = scrape_low_hz * 2 ** (scrape_octaves * rng.random(len(s)) ** 3)
    out = scrapes(at, db + room_db + scrape_db, scrape_hz)
    # colour, level/dB, tail t60/s, shuffle gain/dB, tick gain/dB
    layers = ((BOARD_COLOUR, db + board_db, .35, -1.5, -4),
              (CLAW_COLOUR, db + claw_db, .3, -1.5, -1.5),
              (GRIT_COLOUR, db + grit_db + grit_gain_db, .25, -3, -4))
    for colour, level_db, t60_s, floor_db, tick_db in layers:
        tick = dying(at, level_db + tick_db, 0.032, 0.0012)
        answer_at = at + round(answer_s * SR)
        tail = dying(answer_at, level_db + room_db - 7.0, t60_s, answer_rise_s)
        shuffle = convert_level_to_amplitude(shuffle_db + floor_db) * patter
        out = out + rush(colour, patchy_db=3.0) * np.sqrt(tick ** 2 + tail ** 2 + shuffle ** 2)
    return out


# Claw tips snapping on wire and board: t/s, level/dB, body level/dB relative
CLAW_TICKS = [(0.288, -42, -17), (0.3461, -44, -6), (0.7088, -45, -13), (0.8337, -40, -10),
              (0.9385, -41, -19), (0.9436, -30, -13), (1.154, -39, 0), (1.166, -39, -14),
              (1.302, -37.5, -8), (1.4034, -27.5, -21), (1.6715, -43, 11), (1.678, -33, -5),
              (1.8437, -46, -7), (2.1819, -43, -12), (2.7053, -50, -18), (2.842, -43, -6),
              (3.0959, -41, -9), (3.2613, -42, -7), (3.3076, -33.5, 0), (3.3972, -42, -9),
              (3.5626, -38.5, -6), (3.672, -46, -9), (3.8016, -40, -11), (3.9443, -43, -15),
              (4.0688, -32, -18), (4.1136, -37, -11), (4.362, -34.5, -16), (4.562, -37, -18),
              (4.603, -30, -22), (4.846, -40, -21), (4.8496, -37, -15), (5.009, -30, -20),
              (5.1093, -51, -16), (5.214, -34, -19), (5.2764, -40, -17), (5.283, -37, -21), (5.36, -48, -9),
              (5.5553, -38, 17), (5.636, -24.5, -24), (5.6455, -27, -21), (5.7256, -38, -12),
              (5.787, -51, 22), (5.886, -36, -1), (6.0834, -25, -15), (6.089, -41, 16), (6.4555, -35, -22),
              (6.6403, -43, -12), (6.8366, -29, -12), (6.937, -40, -13), (6.954, -28, -19),
              (7.1544, -44, -14), (7.2146, -34.5, -13), (7.5446, -39.5, 1), (7.776, -41, -12),
              (8.036, -44, -5), (8.102, -38, -15), (8.294, -46, -12), (8.336, -33, -14), (8.388, -36, -1),
              (8.527, -53, 14), (8.543, -33.5, -18), (8.6845, -33, -19), (8.76, -46, -12), (8.838, -44, -4),
              (8.919, -44, -5), (9.2437, -38, -14)]
# Colour of the snap: f/Hz, relative level/dB per Hz
SNAP_COLOUR = [(5500, -19), (7300, -8.5), (9000, 3), (12500, -6), (14500, -16.5), (16000, -23.5)]


def ticks():
    """Very short bright noise snaps with a duller body in the claw colour."""
    s, db, body_db = np.transpose(CLAW_TICKS)
    at = np.round(s * SR).astype(int)
    snap = rush(SNAP_COLOUR) * dying(at, db + 0.5, 0.014, .0001)
    body = rush(CLAW_COLOUR) * dying(at, db + body_db - 7.5, 0.0099, .0002)
    return snap + body


# Short rough notes: t/s, level/dB, f/Hz
ROUGH_NOTES = [(1.165, -45, 1390), (1.303, -43.5, 2015), (1.405, -35, 608), (2.35, -37.5, 800),
               (2.37, -43, 1110), (3.75, -43, 728), (5.557, -33.5, 1430), (5.558, -41.5, 2090),
               (6.089, -40, 1393), (6.09, -50, 2120), (1.722, -45, 1525), (1.722, -51.5, 2350),
               (6.96, -39, 956), (7.16, -47.5, 766), (7.27, -55, 887), (8.53, -43.5, 2050)]


def rasps():
    """Brief notes above the coos, made as rough rings."""
    s, db, hz = np.transpose(ROUGH_NOTES)
    return scrapes(np.round(s * SR).astype(int), db, hz)


# Knocks on the boards: t/s, level/dB, f/Hz (starts at 1.07 f, sags toward 0.57 f), t60/s
KNOCKS = [(1.337, -20, 69.3, 0.29), (2.44, -36, 54.3, 0.33)]


def thumps():
    """A soft blow rings the lowest mode of the boards, whose pitch sags as it dies."""
    out, t = np.zeros(N + SR), np.arange(SR) / SR
    for s, db, hz, t60_s in KNOCKS:
        phase = 2 * np.pi * np.cumsum(hz * (0.57 + 0.5 * np.exp(-t / 0.034))) / SR
        envelope = convert_level_to_amplitude(db - 60 * t / t60_s) * (1 - np.exp(-t / .01))
        out[round(s * SR):][:SR] += envelope * np.sin(phase)
    return out[:N]


# Wing strokes: t/s, feather level/dB, air push level/dB, rise/s, fall/s
STROKES = [(5.95, -29.5, -40, 0.18, 0.15), (6.091, -32, -40, 0.0089, 0.12)]
# Feather slaps within the stroke: t/s, level/dB
FEATHER_SLAPS = [(5.8578, -34), (5.876, -31), (5.891, -28.5), (5.9063, -28), (5.923, -30.5), (5.9432, -36),
                 (5.9666, -31), (5.9876, -32)]
# Colour of the slaps: f/Hz, relative level/dB per Hz
SLAP_COLOUR = [(500, -12), (1400, 1), (2800, -0.5), (4200, -14), (6200, -3), (7600, -26), (9000, -38)]
# Feather resonances: f/Hz, width/Hz, relative level/dB
FEATHER_MODES = [(1163, 25, -5), (1424, 130, -6.5), (2050, 150, -14), (2750, 200, -20), (6200, 900, -28)]
# Colour of the wing air: f/Hz, relative level/dB per Hz
WING_AIR_COLOUR = [(300, -27), (500, 2), (900, -13.5), (2000, -20), (4000, -57), (8000, -42), (12000, -42),
                   (14000, -65), (15000, -120)]
# Wing whistle, one row: start t/s, end t/s, level/dB, mean f/Hz, octave level/dB relative
WING_WHISTLE = (5.85, 6.01, -41, 1450, -16)


def wing():
    """Feathers slap, rustle through their resonances, whistle and push a low gust of air."""
    stroke_db, push_share, bend = 21.5, 0.9, 1.25  # drop over rise or fall; push's share of it; curve
    t = np.arange(N) / SR
    feathers, push = 0, 0
    for s, feather_db, push_db, rise_s, fall_s in STROKES:
        drop_db = stroke_db * np.maximum((s - t) / rise_s, (t - s) / fall_s) ** bend
        feathers = feathers + convert_level_to_amplitude(feather_db - drop_db)
        push = push + convert_level_to_amplitude(push_db - push_share * drop_db)

    s, slap_db = np.transpose(FEATHER_SLAPS)
    slaps = dying(np.round(s * SR).astype(int), slap_db - 1, .018, 0.00024)
    rattle = 1 + 1.5 * slaps / slaps.max()

    def feather_gain(f):
        ring = sum(convert_level_to_amplitude(db) * 1j * f * w / (c * c - f * f + 1j * f * w) for c, w, db in FEATHER_MODES)
        ring = ring / (1 + (f / 9000) ** 4)
        return np.abs(ring) + convert_level_to_amplitude(along(WING_AIR_COLOUR, f))

    rustle = spread(rattle * rng.standard_normal((2, N)), feather_gain)
    gust = np.sqrt(2) * np.sin(2 * np.pi * np.cumsum(61 + 3 * wobble(N, 11)) / SR)

    start, end, db, hz, octave_db = WING_WHISTLE
    phase = 2 * np.pi * np.cumsum(hz * (1 + 0.0115 * wobble(N, 60))) / SR
    fade = np.clip(np.minimum(t - start, end - t) / 0.044, 0, 1)
    held = fade * unit(rattle) * convert_level_to_amplitude(db + 2.1 * wobble(N, 70))
    whistle = held * (np.sin(phase) + convert_level_to_amplitude(octave_db) * np.sin(2 * phase))
    return slaps * rush(SLAP_COLOUR) + feathers * rustle + push * gust + whistle


# Background levels: t/s, murmur/dB, rumble/dB, shuffle/dB
BACKGROUND = [(0.0, -29.5, -52, -54), (0.27, -34.5, -53, -59), (0.62, -29.5, -53.5, -64),
              (1.06, -29, -53.5, -58.5), (1.53, -32, -46.5, -61.5), (2.25, -27.5, -55.5, -54),
              (2.84, -33, -47.5, -60), (3.26, -28, -52, -58), (4.72, -32.5, -53, -62),
              (5.88, -31, -51.5, -57.5), (6.12, -28, -44.5, -59), (6.45, -29, -51, -60.5),
              (6.6, -37.5, -56, -64), (6.85, -34, -58.5, -63), (7.2, -45, -53, -70),
              (7.46, -56, -52, -66.5), (7.6, -40.5, -51, -64), (8.06, -32, -52.5, -68.5),
              (8.72, -29.5, -55, -60), (9.07, -32, -58, -64.5), (9.52, -33, -50, -56.5)]


def scene():
    """Near birds with their echo, far flock, building, feet, rasps, thumps and wing."""
    murmur_db, rumble_db, shuffle_db = curves(BACKGROUND)
    near = coos(murmur_db)
    birds = near + convert_level_to_amplitude(-6.0) * loft(near.mean(0)) + far_birds(murmur_db)
    feet = steps(shuffle_db) + ticks()
    return birds + rumble_and_hum(rumble_db) + feet + rasps() + thumps() + wing()


def low_pass(x):
    """Removes everything above the highest recorded frequency."""
    return signal.sosfilt(signal.butter(12, 16510, fs=SR, output="sos"), x)


# Phase between the ports: f/Hz, left lead/rad
PORT_LEAD_RAD = [(0, 0), (200, 0), (350, .3), (700, 1.5), (1300, 1.4), (2200, .7), (3300, .9), (5200, .3),
                 (6700, -1.2), (7900, -3.1), (9300, -3.2), (12100, -5.5), (12600, -6.2), (16000, -6.3)]


def record(dry):
    """The two ports shift the treble apart, about half a turn near 9 kHz; the top ends at 16 kHz."""
    def ports(hz):
        lead_rad = np.interp(hz, *np.transpose(PORT_LEAD_RAD))
        shift = np.exp(.5j * lead_rad * np.array([[1], [-1]]))
        return shift / (1 + (hz / 16000) ** 60)

    return low_pass(filtered(dry, ports))


dry = scene()
out = record(dry)
pcm_store(out)
```